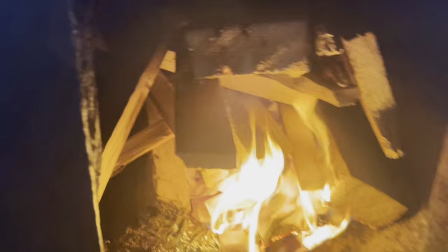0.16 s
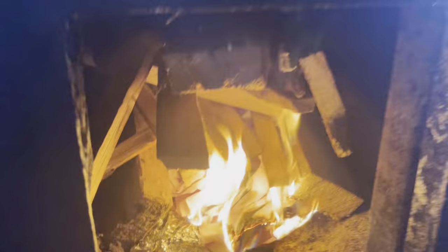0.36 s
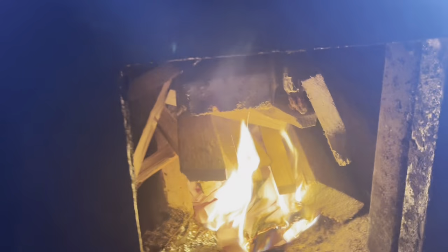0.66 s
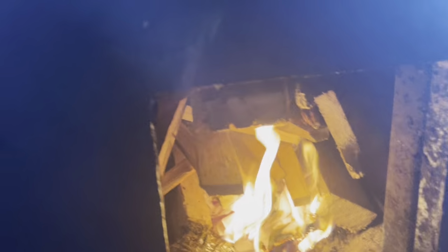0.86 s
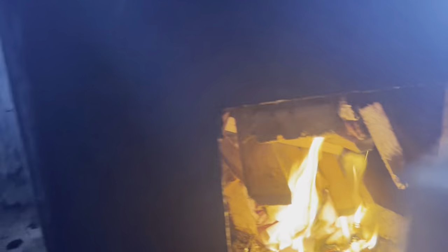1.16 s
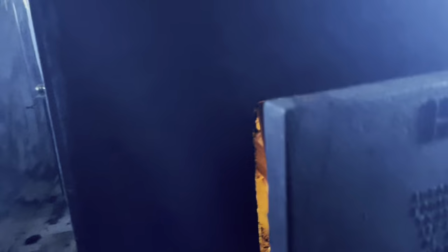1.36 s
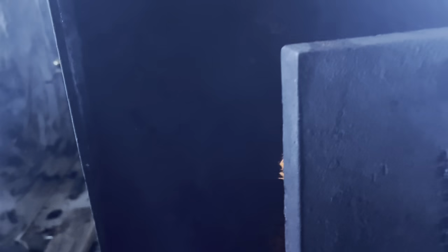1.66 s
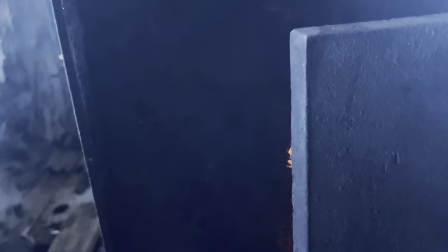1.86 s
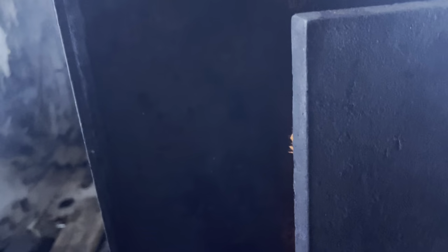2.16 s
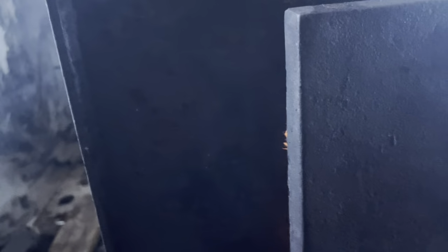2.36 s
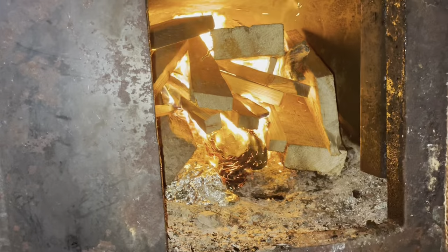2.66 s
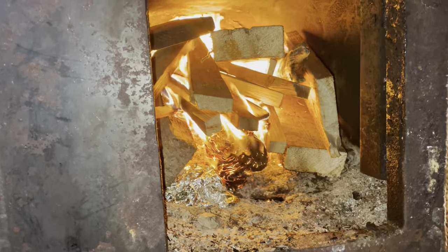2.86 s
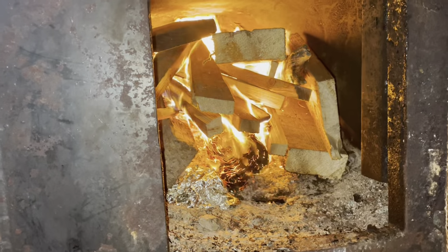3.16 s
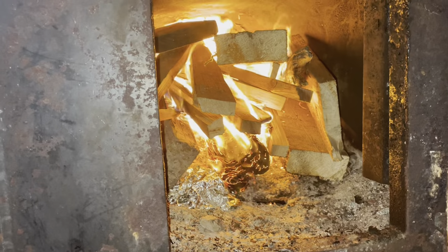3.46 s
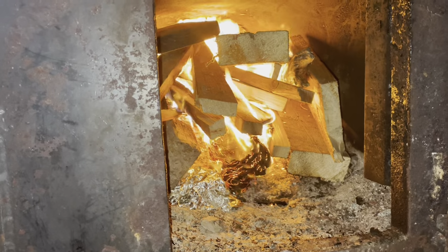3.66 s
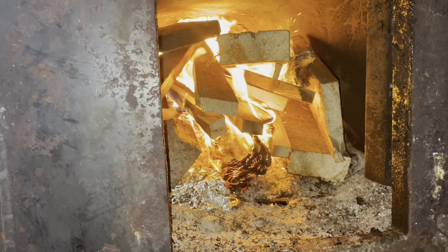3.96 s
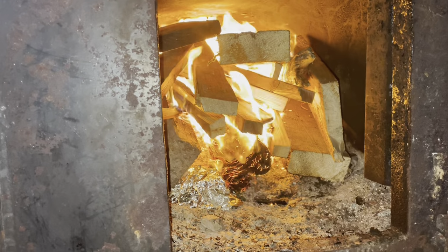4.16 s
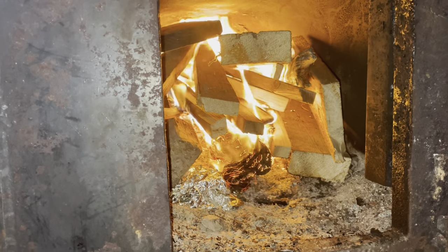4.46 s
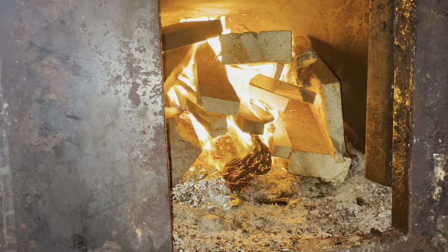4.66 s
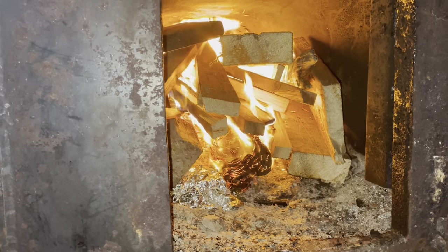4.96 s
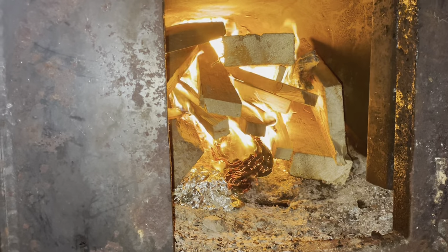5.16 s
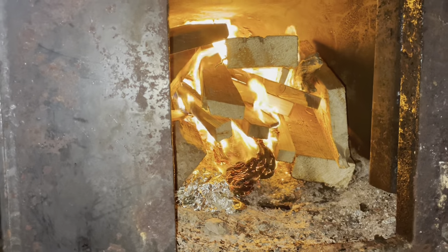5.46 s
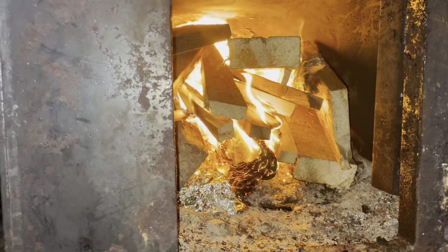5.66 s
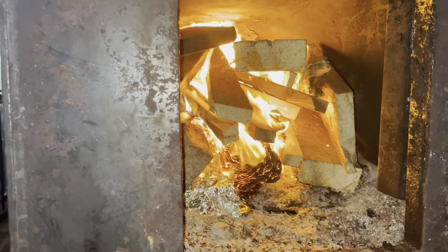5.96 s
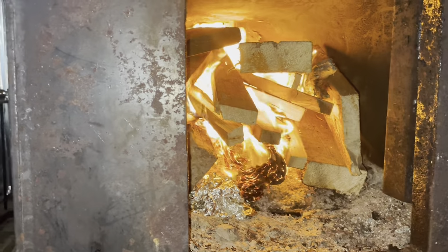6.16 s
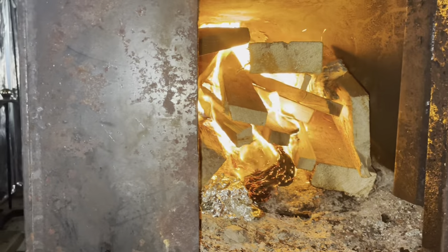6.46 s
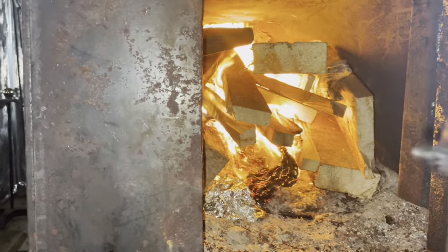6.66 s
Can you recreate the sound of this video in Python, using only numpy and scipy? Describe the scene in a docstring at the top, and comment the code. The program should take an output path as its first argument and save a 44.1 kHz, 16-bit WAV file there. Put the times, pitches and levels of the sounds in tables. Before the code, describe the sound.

A small fire burns quietly in a wood stove in a cabin, its draught throbbing softly in the flue over a low hum and faint hiss, with a couple of snaps and hollow knocks. After a momentary gap, a much louder fire takes over, heard close at the open stove door: a deep, uneven roar with kindling cracking sharply many times a second, light hissing and a few short puffs.

```python
"""A cabin with a wood stove, in two scenes. First a small fire: the draught throbs softly in the flue
over a low hum and a faint hiss, with a few snaps and hollow knocks. After a short silence a big fire
is heard at the open door: turbulent flames drive the flue at its lowest resonance, gas hisses and
puffs, and the kindling cracks many times a second, each crack reverberating in the firebox."""
import sys
import numpy as np
from scipy import signal
from scipy.fft import rfft, irfft
from scipy.io import wavfile
from scipy.ndimage import uniform_filter1d

SR = 44100
rng = np.random.default_rng(int(sys.argv[2]) if len(sys.argv) > 2 else 0)


def inscribe(sig):
    """Save sig as 16-bit PCM at rate SR to the path in sys.argv[1].

    A 1-D sig is mono; a 2-D sig holds one channel per row.
    Samples are clipped to [-1, 1] before scaling.
    """
    pcm = np.round(np.clip(np.atleast_2d(sig).T, -1, 1) * 32767)
    wavfile.write(sys.argv[1], SR, pcm.astype(np.int16))


N = 299880
CHANGE_S = 2.508  # the big fire takes over
# Spectrum of escaping gas. Each row: frequency in Hz, relative density in dB.
HISS = [(500, 15.5), (1000, 1.5), (2500, 1), (5000, -2.5), (8500, -4.5), (13500, -9), (15700, -18),
        (16300, -49)]


def gain_of(db):
    return 10 ** (np.asarray(db) / 20)


def unit_rms(x):
    return x / np.sqrt(np.mean(x ** 2) + 1e-20)


def at_hz(rows, hz):
    f, value = np.transpose(rows)
    return np.interp(np.log(hz + 1), np.log(f + 1), value)


def curve(rows, column=1):
    rows = np.asarray(rows)
    return np.interp(np.arange(N) / SR, rows[:, 0], rows[:, column])


def add(mix, s, sound):
    part = mix[..., round(s * SR):][..., :sound.shape[-1]]
    part += sound[..., :part.shape[-1]]


def resonances(modes, hz):
    """Steep resonance peaks add in power."""
    return np.sqrt(sum(gain_of(2 * db) / (1 + (2 * (hz - f) / width) ** 2) ** 2
                       for f, width, db in modes))


def ring(modes, t, tilt_db):
    """Free vibration: damped sines of random phase, tilted by tilt_db per octave."""
    partials = (gain_of(db + tilt_db * np.log2(hz / 2000) - 60 * t / t60)
                * np.sin(2 * np.pi * (hz * t + rng.random())) for hz, db, t60 in modes)
    return sum(partials) * np.minimum(t / 0.0071, 1)


def stereo(a, b, hz):
    """Partial coherence: two independent spectra mix into left and right."""
    # Each row: frequency in Hz, then in turn coherence, left lead in radians, left excess in dB.
    coherence = [(100, 0.99), (300, 0.93), (600, 0.71), (1500, 0.43), (4000, 0.38), (7000, 0.39), (8200, 1),
                 (10000, 0.68), (11400, 1), (13000, 0.71), (15000, 0.98)]
    lead = [(0, 0), (1700, 0), (3000, .8), (3900, .3), (5200, .6), (6500, -.9), (7900, -3), (11400, -6.2),
            (14800, -9.4), (17000, -9.5)]
    balance = [(60, -1), (600, -1.1), (1500, -0.5), (2500, 4), (5000, 0.5), (9000, 0)]
    same = np.clip(at_hz(coherence, hz), 0, 1)
    turn = np.exp(.5j * at_hz(lead, hz)) * gain_of(.5 * at_hz(balance, hz))
    return np.array([a * turn, (same * a + np.sqrt(1 - same ** 2) * b) / turn])


def noise(gain, size, patchy_db):
    """Random short-time spectra with drifting patches give stereo noise of unit RMS."""
    hz = np.fft.rfftfreq(size, 1 / SR)[:, None]
    a, b, c, d, patches = rng.standard_normal((4 * N // size + 6, len(hz), 5)).T
    patches = unit_rms(uniform_filter1d(uniform_filter1d(patches, 9, 0), 5, 1))
    spectra = stereo(a + 1j * b, c + 1j * d, hz) * gain(hz) * gain_of(patchy_db * patches)
    return unit_rms(signal.istft(spectra, nperseg=size, noverlap=3 * size // 4)[1][:, :N])


def small_flames():
    """Combustion noise: a steady low hum under a varying hiss."""
    # Each row: frequency in Hz, relative density in dB.
    hum_spectrum = [(25, -46), (60, -5.5), (120, -4), (160, -7), (210, 0.5), (270, -8.5), (330, -5.5),
                    (420, -33.5), (540, -16), (680, -57), (1500, -82)]
    # Each row: time in seconds, level in dB.
    hiss_levels = [(0.0, -48.5), (0.12, -50), (0.41, -43.5), (0.63, -53.5), (0.86, -52.5), (1.29, -57),
                   (1.89, -64), (2.32, -58.5), (2.43, -48)]
    hum = noise(lambda hz: gain_of(at_hz(hum_spectrum, hz)), size=2048, patchy_db=-0.3)
    hiss = noise(lambda hz: gain_of(at_hz(HISS, hz)), size=512, patchy_db=2.5)
    return hum * gain_of(-42) + hiss * gain_of(curve(hiss_levels))


def draught(t):
    """Pulse excitation: each throb of a few low cycles rings the modes of the stove pipe."""
    # Each row: centre in seconds, level in dB.
    throbs = [(.018, -41), (.1, -39), (0.23, -40), (0.334, -44), (.449, -33), (.566, -40), (.629, -55),
              (0.749, -37), (0.856, -37), (0.978, -37), (1.053, -53), (1.161, -34.5), (1.279, -42),
              (1.354, -40.5), (1.432, -37), (1.558, -35.5), (1.651, -46), (1.707, -36), (1.807, -38.5),
              (1.883, -39), (1.989, -38.5), (2.097, -39), (2.202, -35), (2.396, -37), (2.47, -42)]
    # Each row: frequency in Hz, relative level in dB, T60 in seconds.
    pipe_modes = [(554, -12, 0.068), (964, -27.5, 0.1), (2330, -29, 0.14)]
    # The ring clears as the door swings to. Each row: time in seconds, gain in dB.
    ring_gains = [(0, -7), (1.0, 4.5), (2.5, 4.5)]
    out, late = np.zeros((2, N)), t - .02
    for s, db in throbs:
        pulse = np.exp(-(late / 0.019) ** 2) * np.sin(2 * np.pi * 78 * rng.uniform(1.0, 1.02) * late)
        pipe = ring(pipe_modes, t, tilt_db=1.4 * rng.standard_normal())
        pipe *= gain_of(np.interp(s, *np.transpose(ring_gains)))
        add(out, max(s - .02, 0), gain_of(db) * (pulse + pipe))
    return out


def crack(db, peak_hz, high_db):
    """Brittle fracture: a fibre bursts in a spray of noise and its echo, coloured by the wood."""
    # Each row: frequency in Hz, relative density in dB.
    spectrum = [(30, -26), (400, 14.5), (900, 2), (1500, 0), (3000, -0.5), (7000, 1), (10000, 7),
                (13500, 5.5), (15700, 7), (16300, -3), (17000, -32)]
    t, hz = np.arange(1024) / SR - .003, np.fft.rfftfreq(1024, 1 / SR)
    spray, other, clumps = rng.standard_normal((3, 1024))
    echo_s, pan = 0.00082 + 0.00397 * rng.random() ** 2, rng.standard_normal()
    stretch = np.clip(1 + 0.07 * (db + 26), .4, 1.6)  # louder cracks last longer
    low_db = -9 - 0.1469 * (db + 26.5) + 2.5 * rng.standard_normal()  # and sound thinner
    bursts = [(0, 1.5, stretch * 0.011), (stretch * echo_s, .9, stretch * 0.01), (-.002, .2, .03)]
    envelope = sum(size * gain_of(-60 * (t - s) / t60) * np.clip((t - s) / 0.00049, 0, 1) ** 2
                   for s, size, t60 in bursts)
    envelope *= gain_of(2 * unit_rms(uniform_filter1d(clumps, size=24)))
    colour = at_hz(spectrum, hz) + 7 / (1 + ((hz - peak_hz) / 600) ** 2)
    colour += low_db / (1 + (hz / 1300) ** 4) + high_db / (1 + (8500 / (hz + 1)) ** 8)
    sound = irfft(stereo(rfft(spray * envelope), rfft(other * envelope), hz) * gain_of(colour))
    midband = irfft(rfft(sound.mean(0)) * (hz > 1500) * (hz < 7500))
    peak_rms = np.sqrt(uniform_filter1d(midband ** 2, size=130).max())
    return sound / peak_rms * gain_of(db + np.array([[1], [-1]]) * 0.48 * pan)


def kindling(ticks_per_s=70, trailing_share=.4):
    """Stress release: loud cracks, and in the big fire random ticks, many trailing a crack."""
    # Each row: start in seconds, midband level in dB, resonance in Hz, gain above 8500 Hz in dB.
    cracks = [(0.0601, -46, 2890, -16), (0.9164, -48.5, 7000, -11), (2.5258, -28.5, 2660, -14),
              (2.6424, -30.5, 4870, -5), (2.7315, -34, 4400, -25), (2.7432, -26.5, 2100, -7),
              (2.7554, -23, 4500, -12), (2.7696, -21.5, 6300, -6.5), (2.834, -41, 1680, -9),
              (2.8685, -16.5, 4000, -10), (2.9254, -22, 1570, -6), (2.9655, -39, 4190, -4),
              (3.0597, -28.5, 1640, -5), (3.0906, -21, 5500, -11.5), (3.0999, -21, 2260, -19),
              (3.1306, -32, 2030, -15), (3.1519, -29, 6660, -15), (3.1728, -15, 1930, -14.5),
              (3.208, -34, 4950, -8), (3.2256, -21.5, 1840, -11), (3.2965, -18.5, 5180, -1),
              (3.4088, -17, 5900, -8), (3.4248, -19, 6300, -5), (3.4417, -36, 6670, -5),
              (3.4698, -33, 4100, -3.5), (3.564, -30.5, 2640, -4), (3.598, -29, 4720, -10),
              (3.6058, -13, 1570, -23), (3.6435, -27.5, 5400, -4), (3.6552, -19.5, 6940, -6),
              (3.7177, -31, 7040, -4), (3.7483, -19, 2260, -16), (3.8506, -32, 2690, -3.5),
              (3.8718, -31, 4470, -9), (3.8827, -32.5, 6300, -5), (3.913, -36.5, 5430, -5.5),
              (3.9287, -35.5, 1630, -8), (3.9702, -31.5, 4600, 0), (3.986, -35.5, 1840, -10),
              (4.0163, -33, 2100, -14), (4.0536, -38, 1660, -14), (4.0635, -38, 2600, -15),
              (4.076, -31.5, 5210, -6), (4.087, -20.5, 4930, -11), (4.1226, -12, 5170, -14.5),
              (4.204, -29.5, 3500, -7), (4.2274, -33.5, 1500, -14), (4.2393, -40, 3900, -5),
              (4.2566, -34.5, 5030, -11), (4.3123, -15.5, 6380, -15.5), (4.328, -32, 6400, -8),
              (4.3392, -36, 7190, 1), (4.428, -17.5, 5070, -8.5), (4.4853, -35.5, 1670, -9),
              (4.5461, -22, 7600, -9.5), (4.5643, -21.5, 4300, -12), (4.7157, -16, 6830, -14),
              (4.816, -21.5, 6560, -22), (4.8314, -35.5, 5140, -10), (4.8828, -34, 4060, -10),
              (4.9127, -31, 2330, -6), (4.9814, -29, 4930, -7), (4.9906, -22, 4200, -16),
              (5.068, -36.5, 2240, -3.5), (5.094, -16, 5140, -15), (5.1702, -34, 4350, -18),
              (5.2286, -26, 2240, -17), (5.3094, -29.5, 4400, -3.5), (5.3704, -27, 6900, -2),
              (5.3827, -17, 6000, -17), (5.4284, -28.5, 4020, -6.5), (5.46, -22.5, 5500, -7),
              (5.5306, -24, 6740, -5.5), (5.5486, -34.5, 5340, -9), (5.6194, -38, 3660, -5),
              (5.685, -21, 4650, -7.5), (5.716, -19, 2290, -18), (5.7393, -19.5, 6800, -17),
              (5.8318, -40, 4760, -7), (5.8415, -37, 2210, -11), (5.9218, -23, 6170, -9),
              (5.9355, -34, 5150, -7), (5.9552, -27.5, 4900, -8), (6.0249, -34, 4250, 9),
              (6.0354, -20.5, 2750, -2), (6.1592, -36, 6280, -14), (6.1923, -39.5, 4990, -11),
              (6.3136, -22, 4240, -8), (6.339, -14, 4740, -20), (6.4624, -40, 4670, -3),
              (6.4964, -31.5, 6700, -9.5), (6.6246, -19, 5550, -6), (6.6513, -11.5, 5800, -12.5),
              (6.727, -33.5, 5500, -4), (6.7503, -39, 6110, -1), (6.7681, -30, 6740, -6)]
    out, span_s = np.zeros((2, N)), N / SR - CHANGE_S
    for s, *row in cracks:
        add(out, s - .003, crack(*row))
    late = [s for s, *row in cracks if s > CHANGE_S]
    for when, size, pitch, trails, wait in rng.random((round(ticks_per_s * span_s), 5)):
        s = CHANGE_S + when * span_s
        if trails < trailing_share:
            s = late[int(when * len(late))] + 0.0093 - .03 * np.log(1 - wait)
        add(out, s, crack(db=-58 + 12.5 * size, peak_hz=2000 + 5000 * pitch, high_db=-6.5))
    return out


def firebox(x):
    """Reverberation: dense reflections between iron walls, each band dying at its own rate."""
    # Each row: frequency in Hz, T60 in seconds.
    decay = [(500, 0.091), (3000, 0.2), (14000, 0.093)]
    a, b = rng.standard_normal((2, 12000)) * (np.arange(12000) > 150)
    hz, t, spectra = signal.stft([a, 1.38 * a + 0.078 * b], SR, nperseg=256)
    tail = signal.istft(spectra * gain_of(-60 * t / at_hz(decay, hz)[:, None]), SR, nperseg=256)[1]
    return signal.fftconvolve(x, tail / np.linalg.norm(tail[0]), axes=1)[:, :N]


def hollow_knocks(t):
    """Impulse response of a stick: damped modes with a burst of noise."""
    # Each row: time in seconds, gain in dB, brightness in dB per octave.
    knocks = [(0.386, -21, 1.5), (1.158, -29.5, -3)]
    # Each row: frequency in Hz, relative level in dB, T60 in seconds.
    stick_modes = [(590, -22.5, 0.26), (950, -17, 0.11), (1630, -6.5, 0.067), (2120, -3, 0.015),
                   (2976, 1, 0.039), (3430, -11.5, 0.029), (3960, -14, 0.07), (5140, -13, 0.036)]
    out = np.zeros((2, N))
    for s, db, tilt_db in knocks:
        spray = gain_of(-60 * t / 0.1) * rng.standard_normal((2, len(t))) * np.minimum(t / 0.00087, 1)
        band = signal.butter(4, [800, 4498 + 300 * tilt_db], "band", fs=SR, output="sos")
        knock = ring(stick_modes, t, tilt_db) + 1.15 * signal.sosfilt(band, spray)
        add(out, s - .001, gain_of(db) * knock)
    return out


def iron_tink(t):
    """Hot iron rings in a single damped mode."""
    return ring([(2479, -56.5, 0.14)], t, tilt_db=0)


def big_flames():
    """Forced resonance: turbulent flames drive the flue and firebox while gas hisses from the wood."""
    # Each row: frequency in Hz, width in Hz, relative level in dB.
    flue_modes = [(78.3, 22, 1.5), (66.6, 10, -27), (96, 23.8, -4.5)]
    firebox_modes = [(161, 93, -10.5), (189, 107, -5.5), (237.4, 32, 0.5), (327.3, 47, -6), (394, 39, -16),
                     (479.8, 24.5, -10), (490, 730, -24.5), (627, 36, -26.5), (826, 80, -32)]
    # Each row: time in seconds, level in dB.
    roar_levels = [(2.55, -17), (3.05, -17.5), (3.26, -24.5), (3.4, -19), (3.47, -25.5), (3.6, -18.5),
                   (3.7, -26), (3.76, -18), (4.28, -25), (4.3, -18.5), (4.55, -17), (4.57, -25.5),
                   (4.99, -19.5), (5.37, -21), (5.51, -39), (5.71, -20.5), (5.84, -29.5), (5.88, -18.5),
                   (6.31, -22.5), (6.5, -33), (6.59, -21), (6.8, -27)]
    # Each row: time in seconds, firebox level before its swell in dB, hiss level in dB.
    flames = [(2.6, -36.5, -60), (3.07, -35.5, -48.5), (3.53, -37, -45), (4.0, -36.5, -59),
              (4.46, -38, -50), (4.93, -37.5, -49), (5.39, -38, -53), (5.86, -38, -56.5),
              (6.32, -39.5, -62.5), (6.79, -38.5, -55)]
    roar_db = curve(roar_levels)
    roar = noise(lambda hz: resonances(flue_modes, hz), size=4096, patchy_db=3.0)
    roar /= np.sqrt(uniform_filter1d(roar[0] ** 2, size=6000) + 0.044)  # the draught feeds it steadily
    body = noise(lambda hz: resonances(firebox_modes, hz), size=2048, patchy_db=2.0)
    body *= gain_of(curve(flames) + 0.64 * (roar_db + 29))  # swells with the roar
    hiss = noise(lambda hz: gain_of(at_hz(HISS, hz)), size=256, patchy_db=2.5)
    return roar * gain_of(roar_db) + body + hiss * gain_of(curve(flames, column=2))


def gas_puffs():
    """Gas bursts out with some cracks: a compression, then a weaker rarefaction."""
    # Each row: start in seconds, approximate peak in dB.
    puffs = [(3.171, -12.5), (3.411, -16), (4.314, -20), (5.372, -11), (6.342, -13)]
    out, age = np.zeros(N), np.arange(2000) / SR / 0.0019
    for s, db in puffs:
        add(out, s, gain_of(db) * 4 * age * (1 - .5 * age) * np.exp(-age))
    return out


def scene():
    """Superposition: the small fire, then the big one, with cracks through both."""
    time = np.arange(N) / SR
    t = time[:12000]  # span of one ringing event
    cracks = kindling()
    # Two reverberation tails alternate, so successive cracks ring with varied colour.
    blend = np.pi * time / .23
    tails = firebox(cracks * np.sin(blend)) + firebox(cracks * np.cos(blend))
    small = small_flames() + draught(t) + hollow_knocks(t)
    add(small, 2.5, iron_tink(t))
    big = big_flames() + gas_puffs()
    return np.where(time < CHANGE_S, small, big) + cracks + gain_of(-20.5) * tails


def record(dry, gap_s=0.008, fall_s=0.0053, rise_s=0.084):
    """A dip to silence between the scenes, soft saturation of the peaks, then a low-pass filter."""
    late = np.arange(N) / SR - CHANGE_S
    fade_s = np.where(late < 0, fall_s, rise_s)
    joined = dry * np.clip((abs(late) - .5 * gap_s) / fade_s, 0, 1)
    limited = joined / (1 + joined ** 4) ** .25
    lowpass = signal.firwin(511, 16900, window=("kaiser", 9), fs=SR)
    return signal.oaconvolve(limited, lowpass[None], "same")


dry = scene()
out = record(dry)
inscribe(out)
```